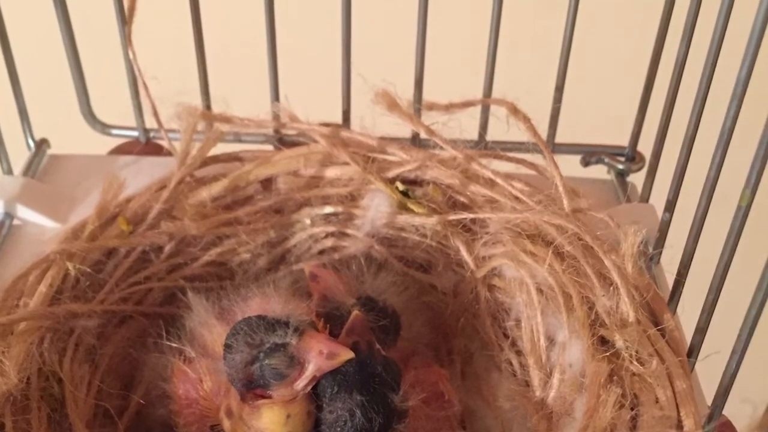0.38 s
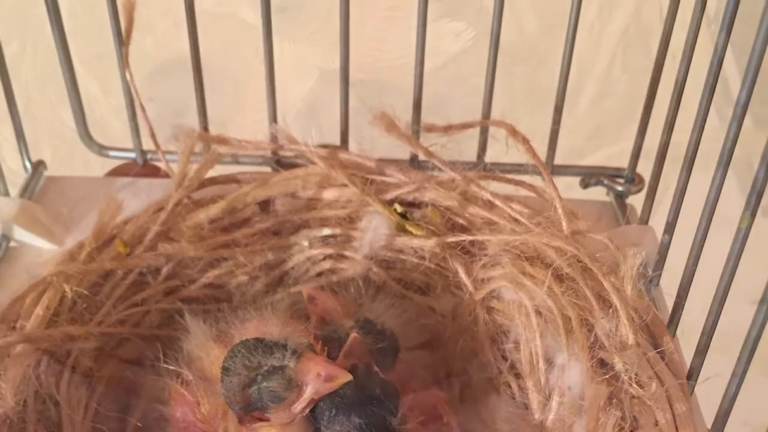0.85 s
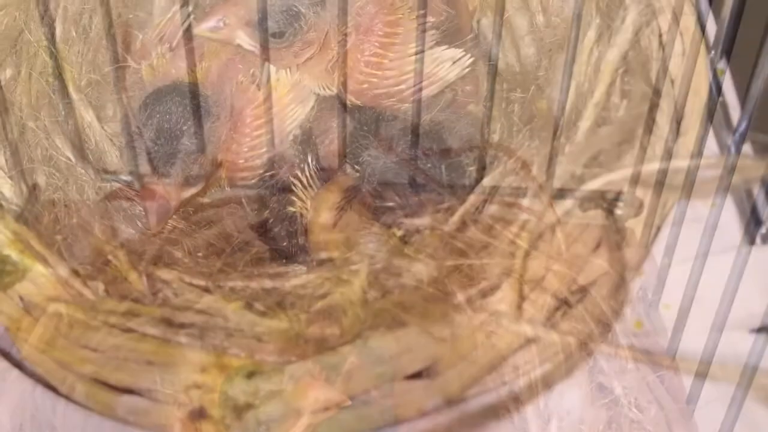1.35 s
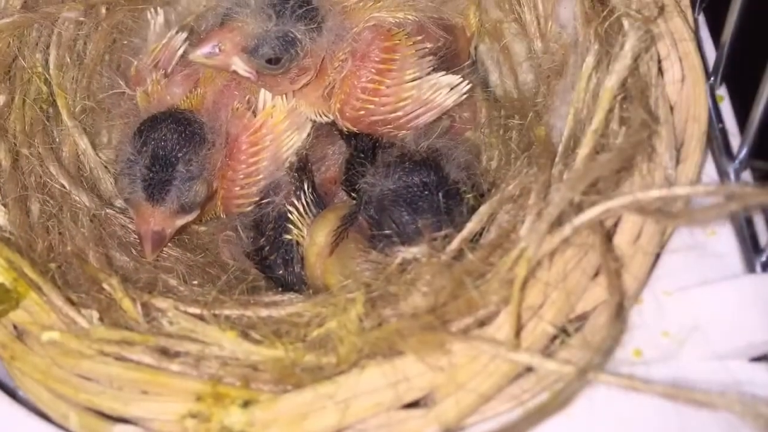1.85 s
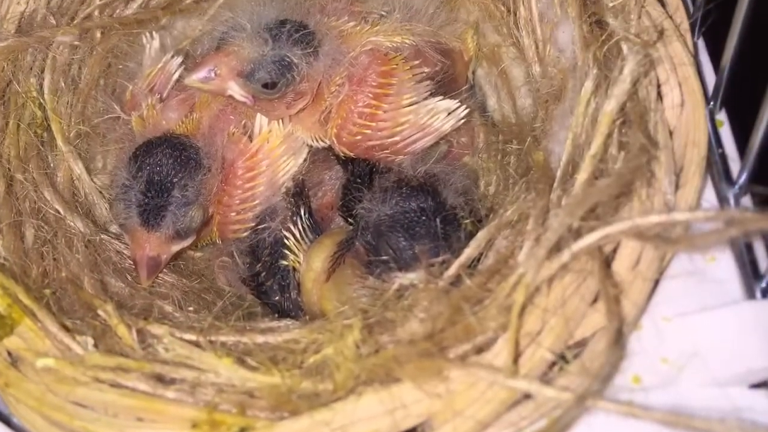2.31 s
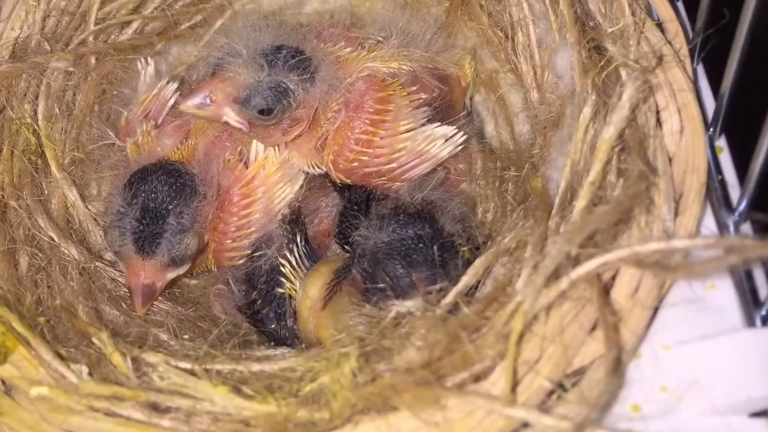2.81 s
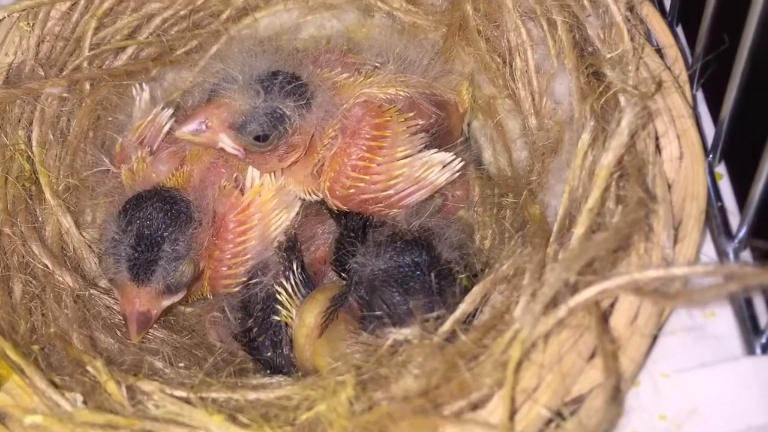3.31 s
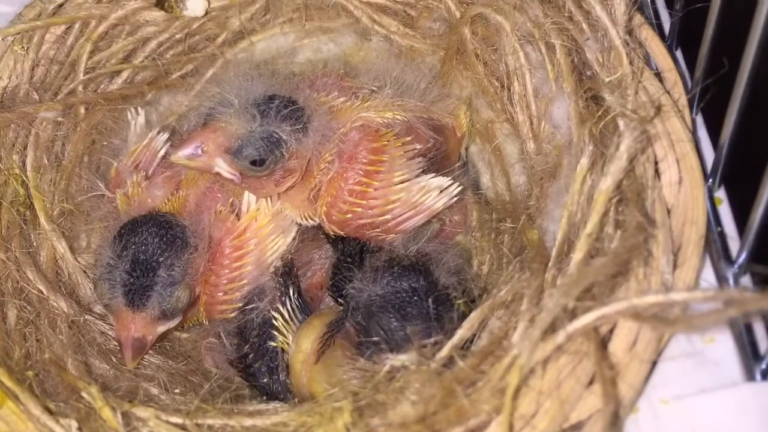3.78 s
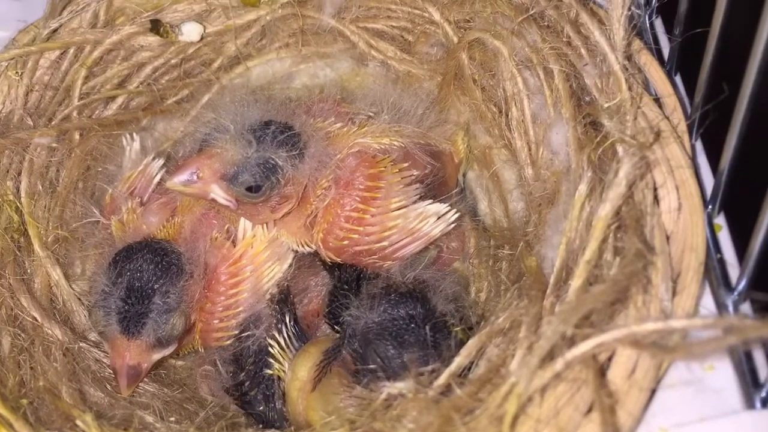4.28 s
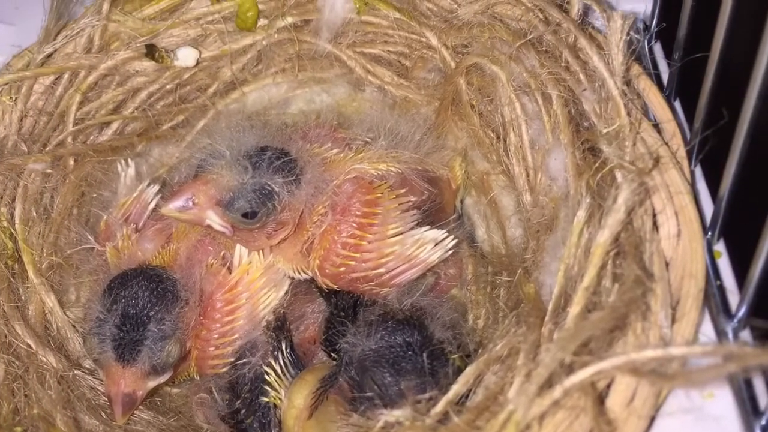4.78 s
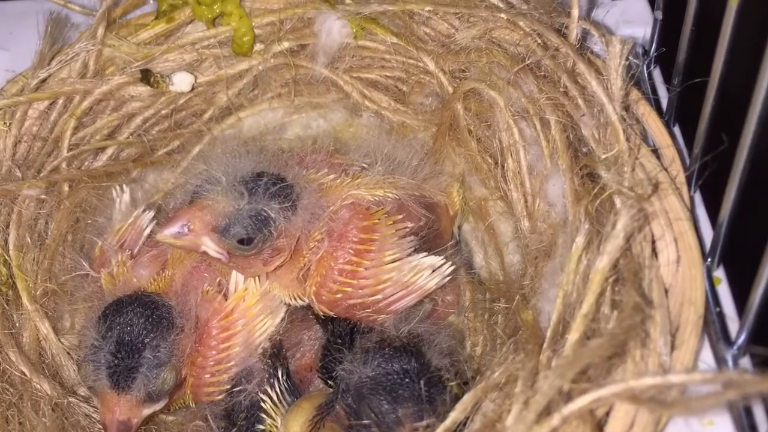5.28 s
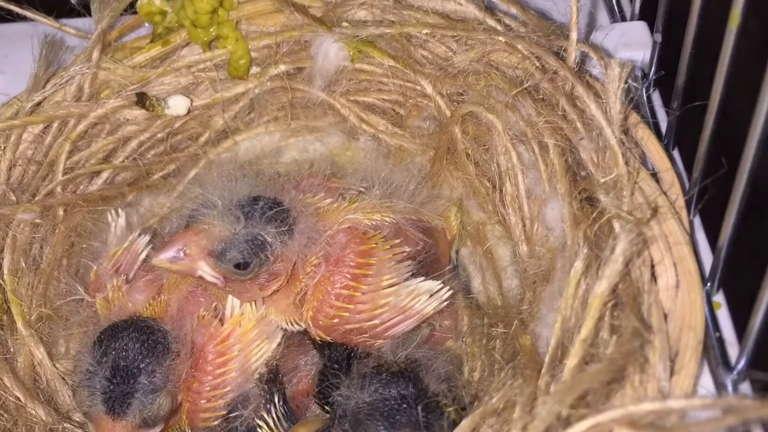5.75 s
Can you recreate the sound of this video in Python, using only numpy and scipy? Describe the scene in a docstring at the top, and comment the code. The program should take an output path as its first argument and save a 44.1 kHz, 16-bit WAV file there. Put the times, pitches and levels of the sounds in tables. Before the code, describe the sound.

In a bare, reverberant room, a caged finch or canary begins with faint peeps, then loud sharp chips, three clear rising whistles, two buzzing trills and hoarse chatter ending in whistles. Two soft knocks follow in a lull, then peeps, straw rustles and three more chips. A small, bright microphone picks up steady hiss.

```python
"""In a bare room, near a cage: finches call with quick whistled chips, two buzzing trills and soft peeps.
Every note is a gliding near-sine, some clear and some hoarse, that the walls smear with decaying echoes.
Straw rustles in grainy noise bursts, two knocks ring a few damped modes, and shaped noise is the room hiss.
A small microphone colours the treble and turns its gain down after loud calls."""
import sys
import numpy as np
from scipy import signal
from scipy.fft import rfft, irfft
from scipy.io import wavfile
from scipy.ndimage import uniform_filter1d, minimum_filter1d

SR = 44100
rng = np.random.default_rng(int(sys.argv[2]) if len(sys.argv) > 2 else 0)


def magnitude_from_level(level_db):
    """Linear magnitude for a level in decibels (20 dB per decade)."""
    exponent = np.asarray(level_db, float) / 20
    return 10 ** exponent


def wrap_up_sound(samples):
    """Save the sound to the file named by the first command line argument, as 16-bit audio."""
    columns = np.atleast_2d(samples).T
    # keep every value between -1 and 1, then stretch to whole-number steps
    tamed = np.clip(columns, -1, 1)
    steps = np.round(tamed * 32767).astype(np.int16)
    wavfile.write(sys.argv[1], SR, steps)


N = 259308

# Weak overtones of the louder calls. Each row: multiple of the pitch, level in dB against it.
CALL_OVERTONES = [(2, -22), (3, -30)]


def unit_rms(x):
    """Scale to unit rms."""
    return x / np.sqrt(np.mean(x ** 2) + 1e-20)


def ring(x, hz, t60):
    """A damped resonance: a unit click sets a sine of height 1 ringing, down 60 dB after t60 seconds."""
    r = magnitude_from_level(-60 / (t60 * SR))
    w = 2 * np.pi * hz / SR
    return signal.lfilter([0, np.sin(w)], [1, -2 * r * np.cos(w), r * r], x + 1e-18)


def peak(x, hz, width_hz, db):
    """A resonance that raises or lowers one band."""
    g = magnitude_from_level(db / 2)
    w = 2 * np.pi * hz / SR
    a = np.tan(np.pi * width_hz / SR)
    above = [1 + a * g, -2 * np.cos(w), 1 - a * g]
    below = [1 + a / g, -2 * np.cos(w), 1 - a / g]
    return signal.lfilter(above, below, x)


def swell(u, fade_in, fade_out):
    """Rounded rise and fall over a note's course u from 0 to 1; the fades are shares of it."""
    nearest_end = np.minimum(u / fade_in, (1 - u) / fade_out)
    return np.sin(np.pi / 2 * np.clip(nearest_end, 0, 1)) ** 2


def syrinx(pitch_hz, rough, overtones=CALL_OVERTONES):
    """A bird's voice: a near-sine with weak overtones; rough is the rms share of a fast random pitch wobble."""
    noise = rng.standard_normal(4 * SR // 10)
    wobble = unit_rms(signal.lfilter([1], [1, -1.6, 0.64], noise))[:len(pitch_hz)]
    cycles = np.cumsum(pitch_hz * (1 + rough * wobble)) / SR
    phase = 2 * np.pi * (rng.random() + cycles)
    voice = np.sin(phase)
    for k, db in overtones:
        voice = voice + magnitude_from_level(db) * np.sin(k * phase) * (k * pitch_hz < 0.45 * SR)
    return voice


def glides(notes, rough, overtones=CALL_OVERTONES):
    """Each note glides from its start pitch over a turning pitch to its end pitch."""
    turn_share, fade_in_share, fade_out_share = 0.46, 0.14, 0.27   # of the note's length
    out = np.zeros(N)
    for s, length, start, turn, end, db in notes:
        u = np.arange(int(length * SR)) / (length * SR)
        corners = np.interp(u, [0, turn_share, 1], [start, turn, end])
        pitch = uniform_filter1d(corners, 1 + len(u) // 5, mode="nearest")   # rounds the turn
        i = int(s * SR)
        out[i:i + len(u)] += magnitude_from_level(db) * swell(u, fade_in_share, fade_out_share) * syrinx(pitch, rough, overtones)
    return out


def plain_glide(s, length, start, end, db):
    """A one-way glide: six tenths of the way is done at the turning point."""
    return s, length, start, start + 0.6 * (end - start), end, db


def hiss():
    """Room hiss: smooth broadband noise that swells and sinks a little."""
    # Colour of the hiss. Each row: frequency in Hz, relative level in dB per Hz.
    hiss_colour = np.array([(35, -79), (60, -44), (201, -9), (343, -15), (453, -22.5), (869, -1.5),
                            (2980, -1.5), (3270, -6), (5080, -11.5), (7200, -7), (10200, -14), (11200, -17),
                            (12600, -23), (14100, -20), (15500, -86)])
    # Its course. Each row: time in seconds, level in dB.
    hiss_course = [(0, -44.5), (1.05, -41), (1.45, -44.5), (2.0, -47), (3.2, -42.5), (3.8, -44.5),
                   (4.3, -41.5), (4.62, -42.5), (5.15, -47.5), (5.7, -47.5), (5.88, -41.5)]
    bass_db = 3   # extra below 3 kHz
    hz = np.fft.rfftfreq(N, 1 / SR) + 1
    colour = magnitude_from_level(np.interp(np.log(hz), np.log(hiss_colour[:, 0]), hiss_colour[:, 1]))
    noise = unit_rms(irfft(rfft(rng.standard_normal(N)) * colour, N))
    low = signal.sosfilt(signal.butter(2, 3000, fs=SR, output="sos"), noise)
    s, level_db = np.transpose(hiss_course)
    level = magnitude_from_level(np.interp(np.arange(N) / SR, s, level_db))
    return level * (noise + (magnitude_from_level(bass_db) - 1) * low)


def peeps():
    """Soft peeps of the other birds: plain glides of a nearly steady voice."""
    # Each row: start in seconds, length in seconds, start pitch in Hz, end pitch in Hz, level in dB.
    peep_notes = [ (0.061, 0.046, 5315, 4295, -33), (0.104, .1, 4230, 4870, -41),
                  (0.167, 0.02, 2450, 2450, -41), (0.698, 0.082, 3342, 2940, -32.5),
                  (0.737, 0.066, 3625, 3847, -36), (1.098, 0.07, 3174, 3680, -31.5),
                  (1.105, 0.013, 5240, 4400, -31), (1.217, 0.051, 3380, 2870, -24.5),
                  (1.314, 0.027, 3650, 3204, -21.5), (1.328, 0.044, 3020, 2830, -19.5),
                  (1.349, 0.02, 4130, 4450, -24.5), (1.503, .038, 4900, 4170, -29),
                  (4.026, 0.051, 5140, 4170, -37), (4.067, 0.11, 4250, 4790, -38.5),
                  (4.077, 0.036, 2180, 2250, -49), (4.127, 0.035, 3213, 3300, -26),
                  (4.15, 0.073, 3124, 2967, -26.5), (4.171, 0.023, 3470, 3960, -30.5),
                  (4.325, 0.022, 5810, 5686, -36), (5.466, 0.072, 3418, 3249, -29.5),
                  (5.514, 0.047, 3980, 4506, -37.5), ]
    # Each row: multiple of the pitch, level in dB against it.
    peep_overtones = [(2, -16.5), (3, -29.5)]
    return glides([plain_glide(*row) for row in peep_notes], 0.022, peep_overtones)


def rustles(ring_share=0.057, grain_share=0.032, ring_t60=0.012):
    """Straw and perch rustles: short crackly bursts of uneven grains with a brief hollow ring."""
    # Each row: start in seconds, relative level in dB, ring frequency in Hz, burst length in seconds.
    rustle_bursts = [(0.485, -37, 2080, 0.041), (1.101, -22.5, 980, 0.024), (1.116, -20, 1400, 0.023),
                     (1.211, -20.5, 1160, 0.017), (1.268, -25, 1540, 0.081), (3.868, -42, 1360, 0.051),
                     (4.315, -26, 1490, 0.037), (4.453, -28.5, 1350, 0.027), (4.463, -28, 810, 0.035),
                     (4.552, -24.5, 1550, 0.011), (5.515, -36.5, 974, 0.05), (5.796, -37, 2030, 0.039)]
    out = np.zeros(N)
    u = np.arange(int(0.08 * SR)) / SR
    for s, db, hz, length in rustle_bursts:
        uneven_db = 5.8 * np.minimum(rng.exponential(1, len(u)), 2.5)
        grains = rng.standard_normal(len(u)) * magnitude_from_level(uneven_db)
        envelope = np.minimum(u / 0.0024, 1) * np.exp(-u / length * 3.14)
        burst = np.zeros(N)
        i = int(s * SR)
        burst[i:i + len(u)] = (grains * envelope)[:N - i]
        out += magnitude_from_level(db) * (ring_share * ring(burst, hz, ring_t60) + grain_share * burst)
    return signal.sosfilt(signal.butter(4, 620, "high", fs=SR, output="sos"), out)


def flicks():
    """Quick up-and-down flicks of pitch just before a chip."""
    # Each row: start in seconds, level in dB.
    flick_starts = [(1.122, -23), (1.441, -18), (1.605, -15), (4.658, -14), (4.802, -21), (4.914, -17.5)]
    # One flick: length in seconds, start pitch, turning pitch and end pitch in Hz.
    flick_shape = (0.016, 4400, 7800, 2750)
    return glides([(s, *flick_shape, db) for s, db in flick_starts], 0.02)


def chips():
    """Loud chips: a fast climb that grows louder to a high top, where a hoarser voice a third lower beats with it."""
    # Each row: start in seconds, length in seconds, start pitch in Hz, level in dB, start against that level in dB.
    chip_notes = [(1.136, .022, 4970, -8.5, -1), (1.248, 0.0219, 4260, -9, -2.5),
                  (1.458, .017, 2870, -5.5, -9.5), (1.622, 0.016, 3274, -1, -12.5),
                  (1.71, 0.015, 2790, -4, -5.5), (1.814, .017, 3000, -2.5, -9),
                  (4.673, .019, 2830, -10.5, -0.5), (4.82, 0.014, 2400, -8.5, -2),
                  (4.932, 0.017, 2550, -7, -7)]
    aim_hz, climb_share = 7110, 0.45   # the climb ends just short of the aim
    second_ratio, second_db, beat_tone_db = 0.83, -4.5, -20.5
    out = np.zeros(N)
    for s, length, start, db, start_db in chip_notes:
        u = np.arange(int(length * SR)) / (length * SR)
        climb = np.sin(np.pi / 2 * np.clip(u / climb_share, 0, 1)) * (0.93 + 0.06 * u)   # the top still creeps up
        pitch = start + (aim_hz - start) * climb
        first = syrinx(pitch, 0.025)
        second = syrinx(second_ratio * pitch, 0.06)
        # the product of the two voices gives the beat tones
        voices = first + climb ** 4 * second * (magnitude_from_level(second_db) + magnitude_from_level(beat_tone_db) * first)
        level = magnitude_from_level(db + start_db * (1 - climb))
        i = int(s * SR)
        out[i:i + len(u)] += level * swell(u, 0.0067, 0.42) * voices
    return out


def whistles():
    """Loud clear whistles close by: plain glides of 30 ms."""
    # Each row: start in seconds, start pitch in Hz, end pitch in Hz, level in dB.
    whistle_notes = [(1.908, 3035, 4326, -7.5), (1.979, 2947, 4264, -7), (2.052, 2940, 4290, -6.5),
                     (3.063, 3830, 2292, -9), (3.092, 2694, 3973, -4.5), (3.166, 3080, 3895, -5.5)]
    return glides([plain_glide(s, 0.03, start, end, db) for s, start, end, db in whistle_notes], 0.02)


def trills(bend=1.5, breath_share=0.15):
    """Buzzing trills: about sixty strokes a second, each diving from top to bottom pitch, with short breaks between."""
    # Each row: start in seconds, length in seconds, level in dB.
    trill_calls = [(2.189, 0.23, -7), (2.484, 0.235, -7)]
    strokes_per_s, first_stroke_from = 61, 0.6   # a trill sets in low, late in a stroke
    top_hz, bottom_hz = 6180, 1970
    opening_extra_hz, opening_s = 1001, 0.035    # early strokes dive from higher up, most so at this time
    bottom_lift_hz = 281                         # mid-trill the dives end up to this much higher
    uneven_s, uneven_db = 0.0006, 0.9            # spread of each stroke's timing and strength
    start_db, rise_s, sag_db, fall_s, end_db = -12, 0.046, -2.5, 0.023, -9
    out = np.zeros(N)
    for s, length, db in trill_calls:
        t = np.arange(int(length * SR)) / SR
        late, strong = rng.standard_normal((2, 40))
        count = first_stroke_from + strokes_per_s * t
        drift = np.interp(count, np.arange(len(late)), late - late[0])
        count = count + strokes_per_s * uneven_s * drift
        stroke = count % 1
        top = top_hz + opening_extra_hz * t / opening_s * np.exp(1 - t / opening_s)
        bottom = bottom_hz + bottom_lift_hz * np.sin(np.pi * (t / length) ** 1.4) ** 2
        pitch = bottom + (top - bottom) * (1 - stroke) ** bend     # the dive slows near the bottom
        gate = swell(stroke, breath_share, breath_share) * np.minimum(t / 0.0016, 1)
        fall = length - fall_s
        corners_s = [0, rise_s, (rise_s + fall) / 2, fall, length]
        shape_db = np.interp(t, corners_s, [start_db, 0, sag_db, 0, end_db])
        shape_db = shape_db + uneven_db * strong[count.astype(int)]
        i = int(s * SR)
        out[i:i + len(t)] += magnitude_from_level(db + shape_db) * gate * syrinx(pitch, 0.006)
    return out


def chatter():
    """Hoarse chatter: each syllable is a dive and an overlapping climb, with low drops between syllables."""
    # Each row: start in seconds, level of the dive in dB, level of the climb in dB.
    syllables = [(2.744, -11.5, -12.5), (2.818, -9.5, -12.5), (2.906, -7, -12.5), (2.967, -13.5, -16),
                 (2.98, -6.5, -38)]
    # Low hoarse drops. Each row: start in seconds, level in dB.
    croak_starts = [(2.878, -31), (2.949, -32.5), (3.02, -51)]
    # One drop: length in seconds, start pitch, turning pitch and end pitch in Hz.
    croak_shape = (0.04, 2200, 1500, 1500)
    # length in seconds, start pitch, turning pitch and end pitch in Hz
    dive, climb = (0.018, 5500, 7000, 4300), (0.03, 2200, 5600, 6700)
    climb_after_s = 0.013
    notes = [(s, *croak_shape, db) for s, db in croak_starts]
    for s, dive_db, climb_db in syllables:
        notes.append((s, *dive, dive_db))
        notes.append((s + climb_after_s, *climb, climb_db))
    return glides(notes, 0.13)


def knocks():
    """Two soft thuds on a hollow panel: softened clicks set its modes ringing."""
    # Each row: time in seconds, relative level in dB.
    knock_hits = [(3.72, -38), (3.753, -35.5)]
    # Modes of the panel. Each row: frequency in Hz, level in dB, time to fall by 60 dB in seconds.
    knock_modes = [(244, 0.5, 0.085), (282, 3.5, 0.11), (1117, 8, 0.049), (1450, 5, 0.033)]
    clicks = np.zeros(N)
    for s, db in knock_hits:
        clicks[int(s * SR)] = magnitude_from_level(db)
    clicks = signal.lfilter([0.2], [1, -0.8], clicks)     # a soft contact
    clicks = signal.sosfilt(signal.butter(4, 170, "high", fs=SR, output="sos"), clicks)
    return sum(magnitude_from_level(db) * ring(clicks, hz, t60) for hz, db, t60 in knock_modes)


def room(x, tail_db):
    """Direct sound, a quick crowd of echoes from cage and near walls, then a tail whose treble dies sooner."""
    tail_t60_s, treble_t60_s, tail_end_s = 0.46, 0.34, 0.65
    early_t60_s, early_db, first_echo_s = 0.09, 3.5, 0.00052
    t = np.arange(int(0.7 * SR)) / SR
    near, noise = rng.standard_normal((2, len(t))) * (t > first_echo_s)
    low = signal.sosfiltfilt(signal.butter(2, 5000, fs=SR, output="sos"), noise)
    tail = low * magnitude_from_level(-60 * t / tail_t60_s) + (noise - low) * magnitude_from_level(-60 * t / treble_t60_s)
    tail *= magnitude_from_level(-60 * (t / tail_end_s) ** 3)     # the tail falls away quickly at its end
    early = near * magnitude_from_level(-60 * t / early_t60_s)
    echoes = magnitude_from_level(tail_db) * unit_rms(tail) + magnitude_from_level(early_db) * unit_rms(early)
    return x + signal.fftconvolve(x, echoes / np.sqrt(len(t)))[:N]


def scene():
    """Birds and rustles in the room, knocks that come straight through the stand, all over the hiss."""
    room_db, soft_tail_db = 4.5, -4   # the soft birds and the straw stir the long tail less
    beak = signal.butter(4, 1150, "high", fs=SR, output="sos")     # a small beak radiates no bass
    loud = signal.sosfilt(beak, flicks() + chips() + whistles() + trills() + chatter())
    soft = signal.sosfilt(beak, peeps()) + rustles()
    mix = hiss() + room(soft, room_db + soft_tail_db) + room(loud, room_db) + knocks()
    return mix[None]


def gain_control(x):
    """Automatic gain: it drops fast when the level passes a knee and recovers at a steady slow rate."""
    knee_db, share, attack_s, release_db_per_s = -22.5, 0.5, 0.033, 20
    level_db = 10 * np.log10(uniform_filter1d(x ** 2, 441) + 1e-12)
    slope = release_db_per_s * np.arange(N) / SR
    wanted_cut_db = share * np.maximum(level_db - knee_db, 0)
    cut_db = np.maximum.accumulate(wanted_cut_db + slope) - slope   # a running peak that leaks away
    r = np.exp(-1 / (attack_s * SR))
    return x * magnitude_from_level(-signal.lfilter([1 - r], [1, -r], cut_db))


def bend_loud(x):
    """Overload in capsule and amplifier: square and cube terms breed mixing tones in loud calls."""
    square_db, cube_db = -29.5, -19.5
    # the capsule bends most at its treble peak
    bright = signal.sosfilt(signal.butter(4, 6300, "high", fs=SR, output="sos"), x)
    return x + magnitude_from_level(square_db) * bright ** 2 - magnitude_from_level(cube_db) * x ** 3


def limiter(x):
    """Turns the gain down around each peak so that it stops at full scale."""
    room_left = minimum_filter1d(1 / np.maximum(np.abs(x), 1), 221)
    return x * uniform_filter1d(room_left, 201)


def roll_off(x):
    """The treble ends steeply here."""
    return signal.sosfilt(signal.butter(12, 15660, fs=SR, output="sos"), x)


def record(dry):
    """A small microphone: its colour, gain control, overload, treble colour, band limits and limiter."""
    # Capsule and housing resonances. Each row: frequency in Hz, width in Hz, level in dB.
    capsule_peaks = [ (2450, 1300, 1.5), (3300, 300, 5), (4460, 350, 4), (5830, 550, 6), (7126, 444, 8.5),
                     (7900, 630, -1.5), ]
    # Treble colour after the amplifier. Each row: frequency in Hz, width in Hz, level in dB.
    treble_peaks = [(10800, 203, -15), (11150, 2290, 19), (12770, 250, -5.5)]
    x = dry[0]
    for hz, width_hz, db in capsule_peaks:
        x = peak(x, hz, width_hz, db)
    x = bend_loud(gain_control(x))
    for hz, width_hz, db in treble_peaks:
        x = peak(x, hz, width_hz, db)
    x = signal.sosfilt(signal.butter(3, 194, "high", fs=SR, output="sos"), x)
    x = signal.sosfilt(signal.butter(10, 14140, fs=SR, output="sos"), x)
    mix = limiter(x)[None]
    return roll_off(mix)


dry = scene()
out = record(dry)
wrap_up_sound(out)
```